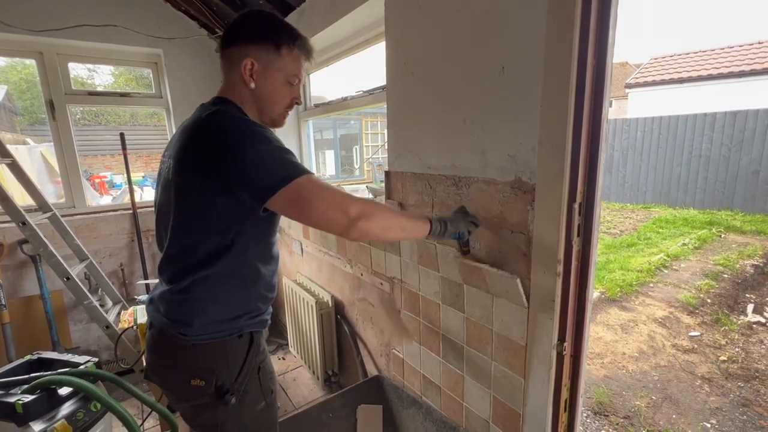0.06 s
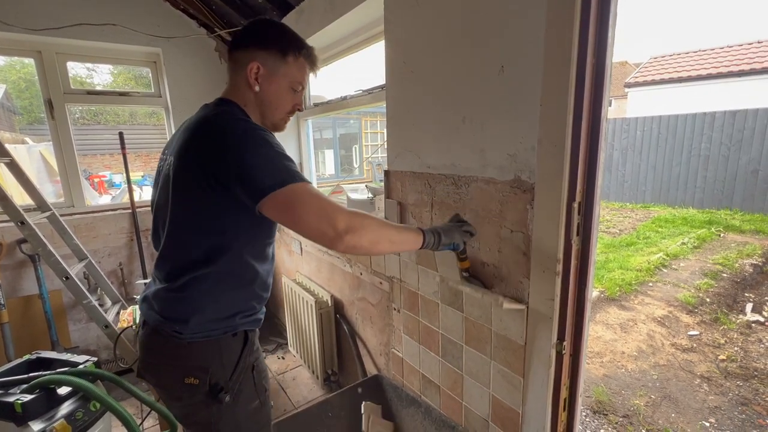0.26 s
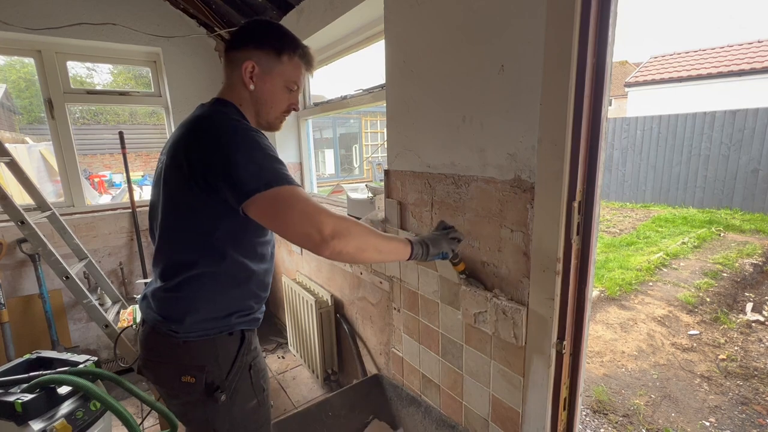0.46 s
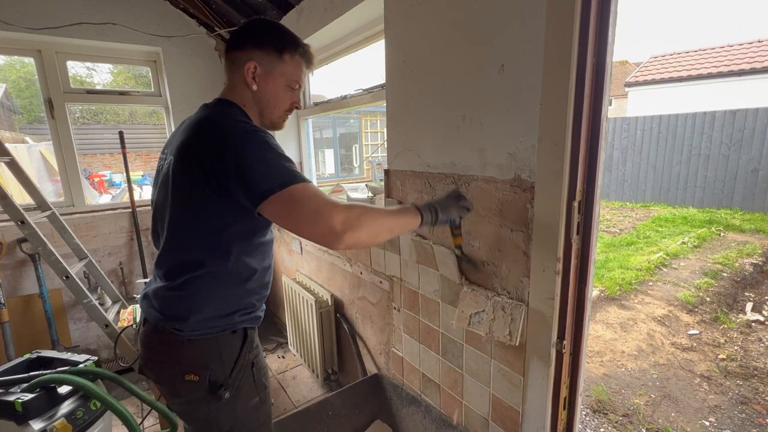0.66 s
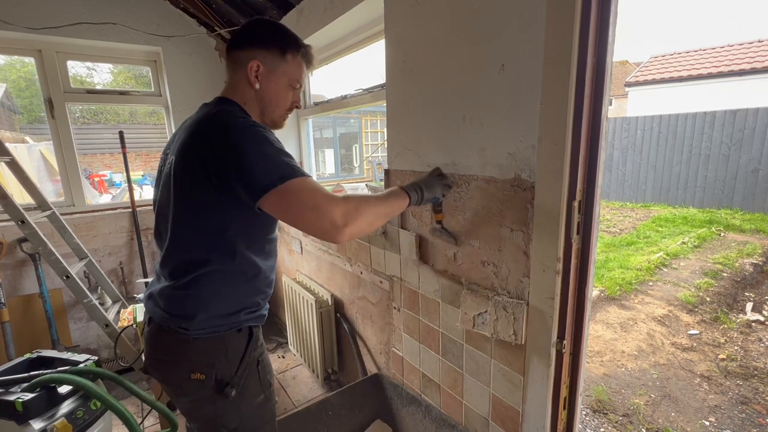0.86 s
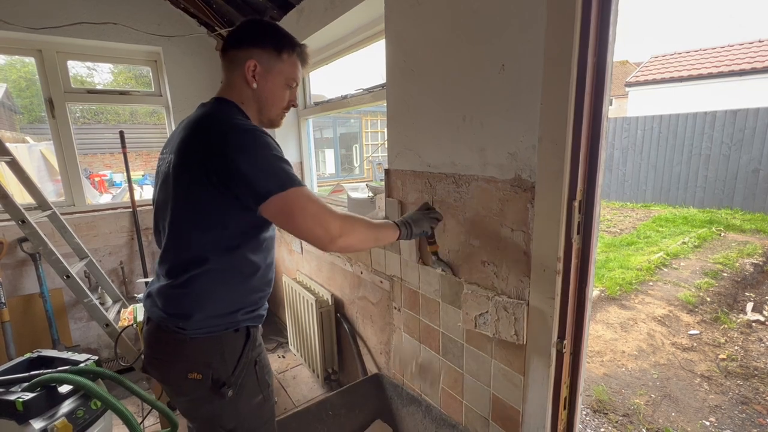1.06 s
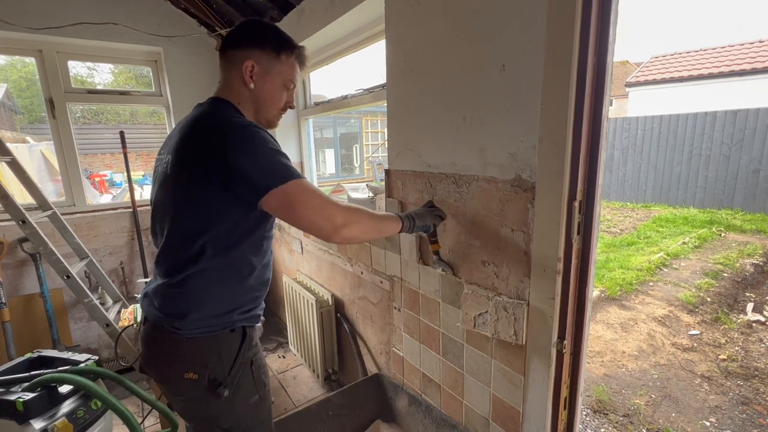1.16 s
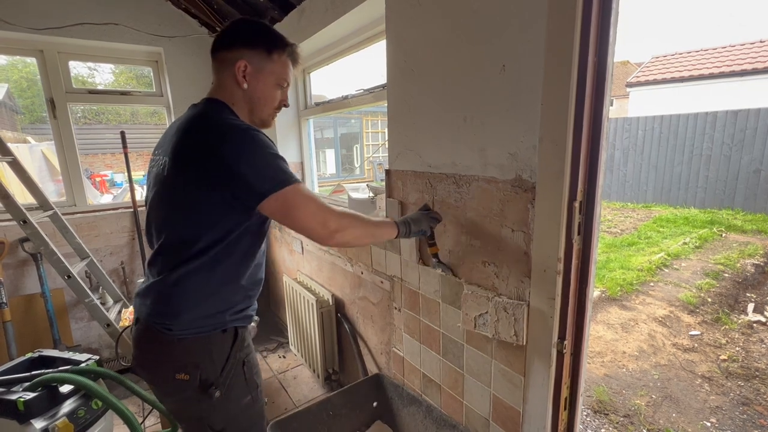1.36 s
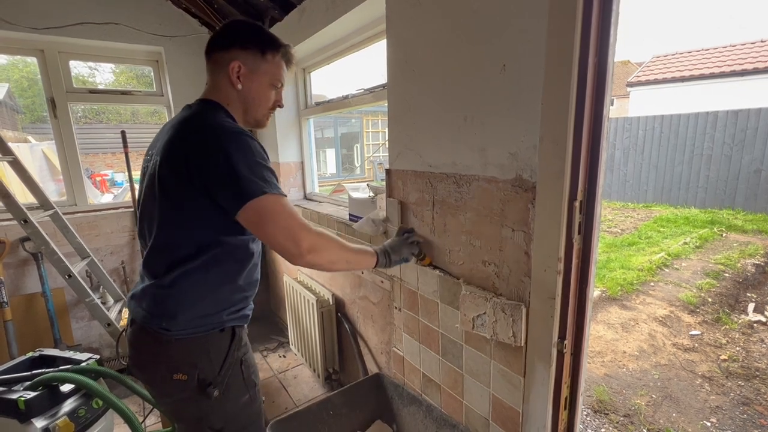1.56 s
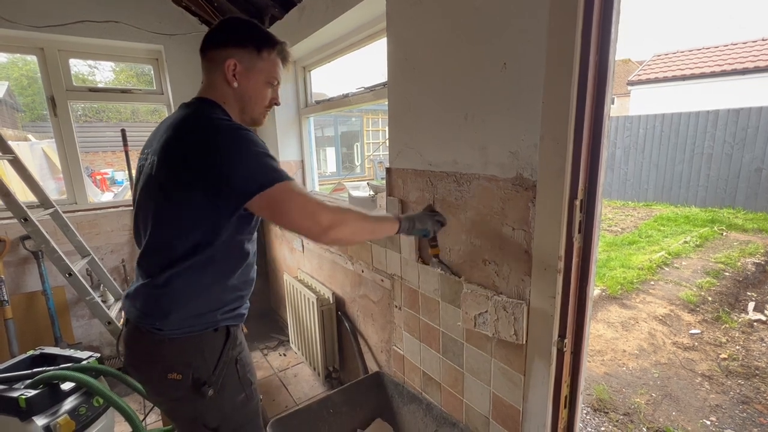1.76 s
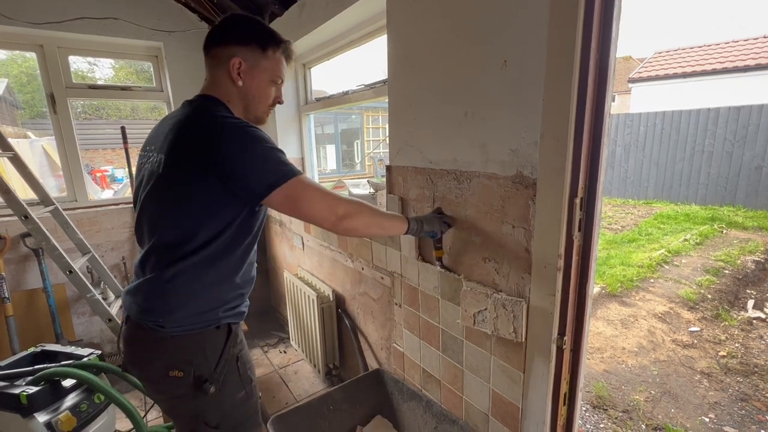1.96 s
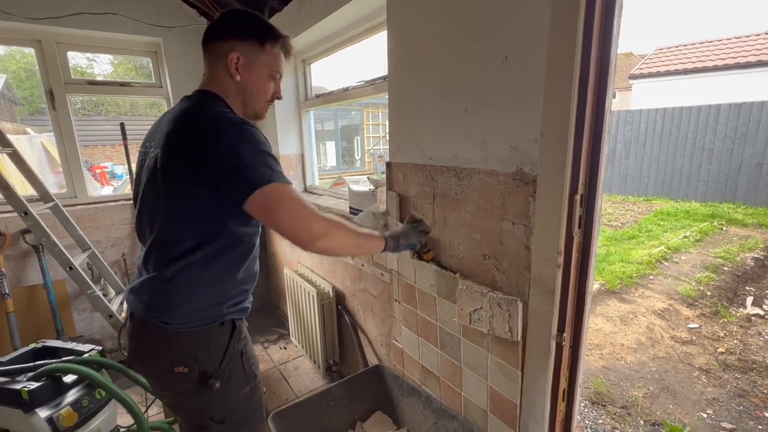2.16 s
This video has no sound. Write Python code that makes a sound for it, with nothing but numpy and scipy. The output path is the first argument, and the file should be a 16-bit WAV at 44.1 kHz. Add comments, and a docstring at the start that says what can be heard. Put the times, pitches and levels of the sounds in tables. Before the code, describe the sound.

Pried tiles crash twice into a plastic tub, with hollow thumps and sharp clinks. Between and after the falls, a blade crunches in adhesive and grit trickles, close to the microphone in a small bare room with faint outdoor rumble.

```python
"""A small bare room, the microphone a little left of where a steel blade levers ceramic tiles off a wall.
The blade crunches in the adhesive; at 0.2 s tiles drop into a plastic tub, which booms while the pieces
clink, break and settle. The blade ticks and crunches on, grit trickles, and a second fall lands at 1.2 s.
The grit stops before the last crunches. Faint outdoor rumble carries in from a distance throughout."""
import sys
import numpy as np
from scipy import signal
from scipy.fft import rfft, irfft
from scipy.io import wavfile
from scipy.ndimage import uniform_filter1d

SR = 44100
rng = np.random.default_rng(int(sys.argv[2]) if len(sys.argv) > 2 else 0)


def wrap_up_sound(samples):
    """Save the sound to the file named by the first command line argument, as 16-bit audio."""
    columns = np.atleast_2d(samples).T
    # keep every value between -1 and 1, then stretch to whole-number steps
    tamed = np.clip(columns, -1, 1)
    steps = np.round(tamed * 32767).astype(np.int16)
    wavfile.write(sys.argv[1], SR, steps)


N = 97020
TIME = np.arange(N) / SR
EVENT_GAIN = np.sqrt(0.031 * SR)  # gives a sound of energy 1 the energy of 31 ms at RMS 1
LEFT_LAG_S = 0.00045  # direct sound reaches the left side of the microphone later

# Spectrum of breaking tile and mortar. Each row: frequency in Hz, relative level in dB.
RUBBLE_SPECTRUM = [(70, -12.5), (250, -2), (700, 2), (1200, 0.5), (1900, -5), (2800, -4), (4200, -5.5),
                   (5000, -13.5), (6100, -5), (7200, -15.5), (9500, -15.5), (11000, -26), (16000, -26)]
# Spectrum of crumbling adhesive. Each row: frequency in Hz, relative level in dB.
ADHESIVE_SPECTRUM = [(60, -5.5), (200, 4.5), (600, -2.5), (1900, -1.5), (4400, -8.5), (9000, -11.5),
                     (10500, -19), (12500, -20.5), (16000, -33.5)]


def tub():
    """The plastic bottom flexes for a few cycles under each tile, then the walls ring on."""
    # Each row: start in seconds, flex level in dB, flex pitch in Hz, swell in seconds, ring level in dB.
    landings = [(0.2049, -6, 252.7, 0.0056, -20), (0.2059, -12, 372, 0.003, -24.5),
                (.229, -15.5, 186, 0.0035, -27.5), (.254, -15.5, 220.1, 0.025, -27.5),
                (0.442, -26, 158, 0.014, -30.5), (.59, -32, 150.8, 0.025, -36.5),
                (0.947, -43.5, 158, 0.027, -43), (1.175, -9.5, 149, 0.0071, -26.5),
                (1.228, -21, 204.8, 0.024, -36)]
    # Each row: frequency in Hz before a 1% lowering, level in dB, seconds to fall 60 dB.
    wall_modes = [(133.86, -11, .55), (180.2, -14, .5), (216.41, 4, 0.35), (259.8, -16.5, 1.1),
                  (304.1, -14, 0.49), (409.5, -4, 0.089), (487, -12.5, 0.93), (591.5, -6.5, 0.41),
                  (626, 1, 0.22), (815, -12.5, 0.25)]
    # A hollow note hangs on after each fall. Each row: start in seconds, level in dB, second it is damped.
    hollows = [(.48, -28, .95), (1.23, -37.5, 1.561)]
    boom = hollow = 0
    for start, db, hz, swell, ring_db in landings:
        flex = -(TIME / swell * np.exp(1 - TIME / swell)) ** 2 * np.sin(2 * np.pi * hz * TIME)
        ring = ringing(wall_modes, ratio=0.99, scatter_db=3)
        boom += from_db(db) * placed(flex, start) + from_db(ring_db) * placed(ring, start)
    hollow_hz, hollow_t60_s, damping_s = 258, 1.25, 0.03
    note = np.sin(2 * np.pi * hollow_hz * TIME) * np.exp(-np.log(1000) * TIME / hollow_t60_s)
    for start, db, damped in hollows:
        hollow += from_db(db) * placed(note, start) * np.exp(-np.maximum(TIME - damped, 0) / damping_s)
    room_db, pan_db = -7, 1.54
    left, right = boom + from_db(room_db) * through(boom, room_tail()) + hollow
    return np.array([placed(left, LEFT_LAG_S) * from_db(-pan_db), right * from_db(pan_db)])


def rubble():
    """Tiles and mortar crash down in bursts of brittle cracking."""
    # Each row: start in seconds, level in dB, rise and decay in seconds, bass and treble in dB.
    crashes = [(-.012, -29, 0.002, 0.0183, 13.5, 2), (.189, -22, 0.0085, 0.0036, 0.5, 2.5),
               (.2055, -16, .002, 0.0058, 6, -9), (.227, -19.5, 0.006, 0.012, 1, 0),
               (.274, -22.5, 0.00351, 0.008, -9, 1), (.435, -23.5, .007, 0.015, 6.5, -6),
               (.505, -29.5, 0.0034, 0.087, 1, -6), (1.173, -15, .0015, 0.018, -1.5, 1),
               (1.21, -22.5, 0.0042, 0.012, -13.5, -1.5)]
    return fractures(crashes, RUBBLE_SPECTRUM, treble_hz=3060)


def tile_clinks():
    """Three pieces of similar size rattle against each other and ring."""
    # Each row: start in seconds, level in dB, rattle decay in seconds, pitch ratio, relative pitch spread.
    clinks = [(.249, -20.5, 0.0046, 1.02, 0.014), (.262, -19, 0.0038, 1.0, 0.004),
              (.277, -19, 0.0081, 1.0, 0.006), (.373, -35, 0.0033, 1.0, 0.00347),
              (.457, -28, 0.005, 0.99, 0.004), (0.507, -42, 0.004, 1.1, 0.0082),
              (1.174, -23, 0.00352, 0.98, 0.024), (1.199, -19, 0.017, 1.035, 0.033)]
    # Each row: frequency in Hz at pitch ratio 1, level in dB, seconds to fall 60 dB in a whole tile.
    tile_modes = [(2270, -5.5, 0.13), (2494, 4.5, 0.12), (3343, -2, 0.15), (3610, -4.5, 0.21),
                  (3845, 0.5, 0.1), (4115, 1, 0.11), (4340, -5.5, 0.04), (5610, -1.5, 0.094),
                  (5750, -4, 0.08), (6060, -4, 0.08)]
    out = 0
    for start, db, decay, ratio, spread in clinks:
        damping = np.exp(-300 * abs(spread) * TIME[:SR])  # mixed shards ring shorter than whole tiles
        rattle = 0
        for side in (-1, 0, 1):
            knocks = flurry(per_s=350, rise_s=0.00027, decay_s=decay)
            ring = damping * ringing(tile_modes, ratio * (1 + spread * side), scatter_db=1.5)
            rattle += signal.fftconvolve(knocks, ring)
        out += from_db(db) * placed(unit(rattle), start)
    return out * EVENT_GAIN


def tile_snaps():
    """A tile snaps or lands on its edge: one hard click."""
    # Each row: start in seconds, level in dB.
    snaps = [(.258, -29), (0.283, -33.5), (1.1743, -21.5)]
    clicks = sum(from_db(db) * placed([-1], start) for start, db in snaps)
    return through(clicks * EVENT_GAIN, colour(RUBBLE_SPECTRUM))


def blade_ticks():
    """The blade snaps off chips; each pings with three clashing partials."""
    # Each row: start in seconds, level in dB, pitch in Hz before a 1% lowering.
    ticks = [(.178, -32, 11500), (.2155, -24, 3440), (0.2488, -26, 9400), (.25, -23, 4120),
             (0.443, -30.5, 3900), (.506, -38, 6020), (.51, -32, 3960), (0.888, -46, 2600),
             (1.174, -20, 3480), (1.185, -39.5, 10000), (1.204, -22, 4330), (1.383, -54, 10000),
             (1.467, -52, 3300), (2.074, -44.5, 2750)]
    spread, side_db = 0.085, -8.5  # pitch offset and level of the outer partials
    out = 0
    for start, db, hz in ticks:
        t60 = 0.032 * (3000 / hz) ** 2.2  # smaller chips die much sooner
        partials = [(hz * (1 + spread * side), side_db * abs(side), t60) for side in (-1, 0, 1)]
        ping = unit(ringing(partials, ratio=0.99, scatter_db=2))
        out += from_db(db) * placed(ping, start)
    return out * EVENT_GAIN


def adhesive():
    """Adhesive crumbles under the blade in short crunches."""
    # Each row: start in seconds, level in dB, rise and decay in seconds, bass and treble in dB.
    crunches = [(.014, -34, 0.0069, 0.015, 9, 6.5), (.043, -41, 0.0053, 0.088, 9.5, 5.5),
                (.177, -29.5, 0.0026, 0.0168, 0, 9.5), (.702, -39.5, 0.014, 0.01, 1.5, -29),
                (.76, -46, 0.039, 0.01, -6.5, 4), (.866, -42, 0.01236, 0.017, -25, 6.5),
                (.942, -42.5, 0.01327, 0.0138, 9.5, 7.5), (.974, -24, 0.0097, 0.011, -6, -1.5),
                (1.40, -43.5, 0.021, 0.0092, -5, -1.5), (1.458, -44.5, .012, 0.0078, -10, 0),
                (1.66, -51, .018, 0.013, 2, -14), (1.805, -57.5, 0.019, 0.033, 7.5, 2.5),
                (2.052, -40, 0.039, 0.015, -7, -2), (2.12, -41, 0.0226, 0.044, -9, -2.5)]
    return fractures(crunches, ADHESIVE_SPECTRUM, treble_hz=5700)


def grit(per_s=57, level_db=-61, until_s=1.88):
    """Loose crumbs trickle down, each a tiny click."""
    crumbs = (rng.random(N) < per_s / SR) * rng.standard_normal(N) * (TIME < until_s)
    return from_db(level_db) * through(unit(crumbs) * np.sqrt(N), colour(ADHESIVE_SPECTRUM))


def in_room(x, room_db, scatter, smear_s=0.0032):
    """Sound reaches the microphone from the right, partly smeared by near wall and floor, then echoes."""
    smear = np.sqrt(2) * unit(stereo_noise() * np.exp(-TIME / smear_s))
    direct = np.array([placed([1], LEFT_LAG_S), placed([1], 0)])
    response = np.sqrt(1 - scatter) * direct + np.sqrt(scatter) * smear + from_db(room_db) * room_tail()
    return through(x, flattened(response))


def room_tail(build_s=0.0037):
    """Diffuse reflections off the bare walls, dying at their own rate in each band."""
    # Each row: frequency in Hz, seconds to fall 60 dB.
    reverb_times = [(80, .4), (400, 0.43), (2000, 0.44), (9000, 0.34), (15000, 0.067)]
    noise, tail = rfft(stereo_noise()), 0
    hz = np.arange(noise.shape[1]) * SR / N
    edges = np.geomspace(30, 20000, 14)
    for low, high in zip(edges, edges[1:]):
        band = irfft(noise * (hz >= low) * (hz < high), N)
        tail += band * from_db(-60) ** (TIME / at_hz(reverb_times, np.sqrt(low * high)))
    return np.sqrt(2) * unit(tail * (1 - np.exp(-TIME / build_s)))


def outdoor_rumble():
    """Faint noise from far outside; its low end is stronger at first."""
    # Each row: frequency in Hz, relative level in dB.
    spectrum = [(20, -18), (35, -8.5), (55, 5.5), (120, -9), (220, -8), (400, -32), (1500, -27.5),
                (10000, -38), (16000, -50.5)]
    # Each row: time in seconds, bass boost in dB.
    bass_curve = [(.17, 13), (.28, 3), (2.2, -3)]
    air = from_db(-57) * through(stereo_noise(), colour(spectrum))
    bass_gain = from_db(np.interp(TIME, *np.transpose(bass_curve)))
    return air + (bass_gain - 1) * butter(air, hz=130, kind="low", order=1)


def fractures(bursts, spectrum, treble_hz, bass_hz=820):
    """Brittle material breaks in flurries of tiny cracks, each flurry with its own bass and treble."""
    out = 0
    for start, db, rise, decay, bass_db, treble_db in bursts:
        burst = flurry(per_s=1800, rise_s=rise, decay_s=decay)
        burst += (from_db(bass_db) - 1) * butter(burst, bass_hz, "low", order=1)
        burst += (from_db(treble_db) - 1) * butter(burst, treble_hz, "high", order=1)
        out += from_db(db) * placed(burst, start)
    return through(out, colour(spectrum))


def flurry(per_s, rise_s, decay_s, spread_db=4.5):
    """A run of uneven contacts that swells and fades."""
    size = N // 4
    t = TIME[:size]
    contacts = rng.random(size) < per_s / SR
    contacts[int(rise_s * SR)] = True  # one always lands on the peak
    strength = from_db(spread_db * np.minimum(rng.exponential(1, size), 2)) * rng.choice([-1, 1], size)
    envelope = np.minimum((t + 1 / SR) / rise_s, 1) ** 2 * np.exp(-np.maximum(t - rise_s, 0) / decay_s)
    return unit(contacts * strength * envelope) * EVENT_GAIN


def ringing(modes, ratio, scatter_db):
    """Decaying modes, each struck with a strength of its own."""
    hz, db, t60 = np.transpose(modes)[:, :, None]
    t = TIME[:SR]
    strength = from_db(db + scatter_db * rng.standard_normal(db.shape))
    return np.sum(strength * np.exp(-np.log(1000) * t / t60) * np.sin(2 * np.pi * hz * ratio * t), axis=0)


def stereo_noise():
    """White noise that is alike on both sides of the microphone in the bass only."""
    # Each row: frequency in Hz, left-right correlation.
    likeness = [(60, .92), (200, 0.9), (400, 0.51), (700, 0.3), (1300, -0.41), (2400, 0.029),
                (15000, -0.03)]
    mid, side = rfft(rng.standard_normal((2, N)))
    alike = at_hz(likeness, np.arange(len(mid)) * SR / N)
    return irfft(np.sqrt((1 + alike) / 2) * mid + np.sqrt((1 - alike) / 2) * side * [[1], [-1]], N)


def flattened(response):
    """Level out the broad humps in the spectrum of a diffuse response."""
    spectrum = rfft(response)
    smooth_power = uniform_filter1d(np.abs(spectrum) ** 2, size=200, axis=-1)
    flat = irfft(spectrum / np.sqrt(smooth_power + 1e-9), N)
    return np.sqrt(2) * unit(flat[:, :N // 2])


def colour(points, size=4096):
    """Causal response with the given spectrum, energy 1."""
    hz = np.arange(size // 2 + 1) * SR / size
    cepstrum = irfft(np.log(from_db(at_hz(points, hz))))
    cepstrum[1:size // 2] *= 2
    cepstrum[size // 2 + 1:] = 0
    return unit(irfft(np.exp(rfft(cepstrum))))


def from_db(db):
    """Decibels to gain."""
    return 10 ** (np.asarray(db) / 20)


def unit(x):
    """Scale to energy 1."""
    return x / np.sqrt(np.sum(x ** 2) + 1e-20)


def at_hz(points, hz):
    """Read a table on a log-frequency axis."""
    frequencies, values = np.transpose(points)
    return np.interp(np.log(np.maximum(hz, 1)), np.log(frequencies), values)


def through(x, response):
    """Convolve and keep the length of the scene."""
    return signal.fftconvolve(np.atleast_2d(x), np.atleast_2d(response), axes=-1)[:, :N]


def butter(x, hz, kind, order):
    """Butterworth filter."""
    return signal.sosfilt(signal.butter(order, hz, kind, fs=SR, output="sos"), x + 1e-18)


def placed(x, start):
    """Delay a sound to its start in seconds."""
    return np.interp(np.arange(N) - round(start * SR), np.arange(len(x)), x, left=0, right=0)


def scene():
    """Work at the wall and falls into the tub share one small room, over a distant rumble."""
    wall = in_room(adhesive() + grit(), room_db=1, scatter=0.79)
    wall += in_room(blade_ticks(), room_db=-5.5, scatter=0.6)
    falls = in_room(rubble(), room_db=-0.5, scatter=0.79)
    falls += in_room(tile_clinks() + tile_snaps(), room_db=-8.5, scatter=0.6)
    falls += tub()
    return wall + butter(falls, hz=110, kind="high", order=3) + outdoor_rumble()


def record(dry):
    """The microphone has a dip in the high treble; the highest peaks are rounded and the top is cut."""
    dip_hz, ceiling, stop_hz = 14600, 1.05, 17000
    dipped = signal.lfilter(*signal.iirnotch(dip_hz, Q=4.8, fs=SR), dry)
    rounded = dipped / (1 + (dipped / ceiling) ** 4) ** (1 / 4)
    return signal.sosfilt(signal.cheby2(12, 70, stop_hz, fs=SR, output="sos"), rounded)


dry = scene()
out = record(dry)
wrap_up_sound(out)
```